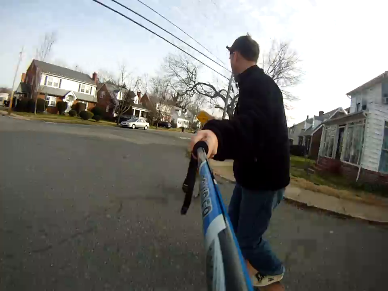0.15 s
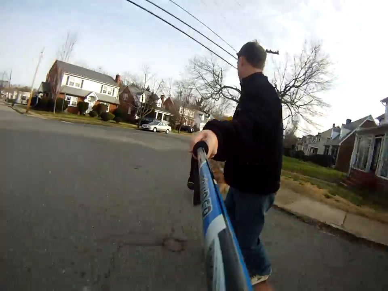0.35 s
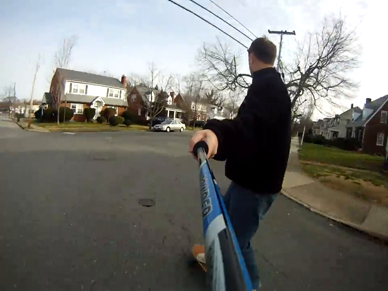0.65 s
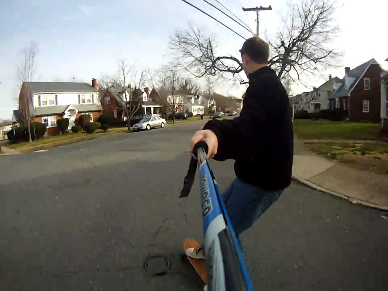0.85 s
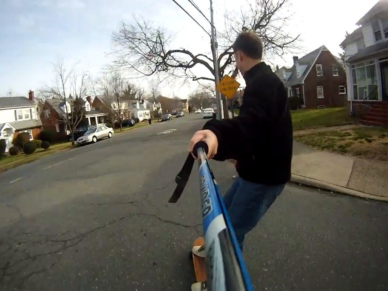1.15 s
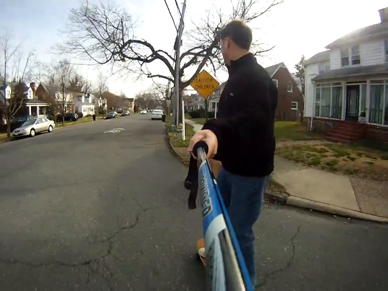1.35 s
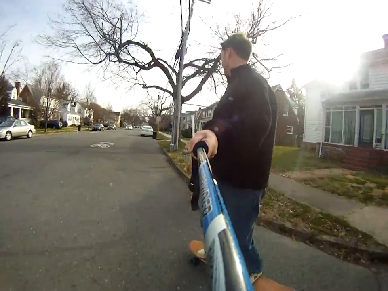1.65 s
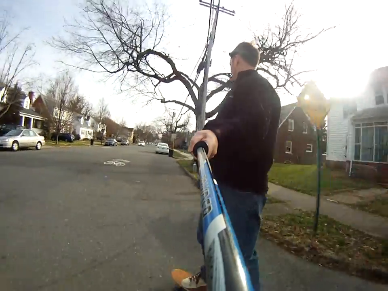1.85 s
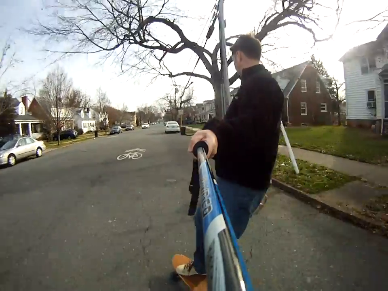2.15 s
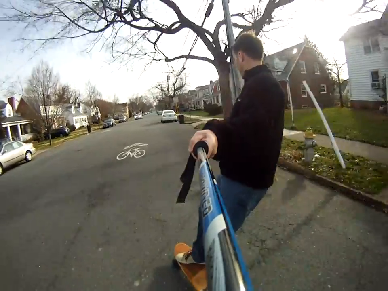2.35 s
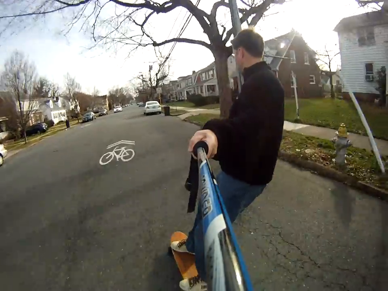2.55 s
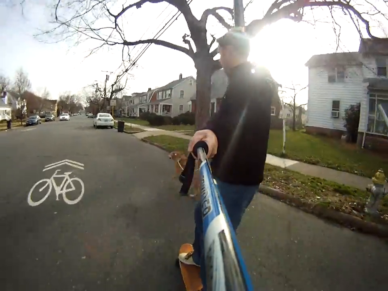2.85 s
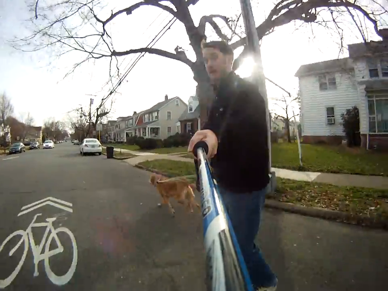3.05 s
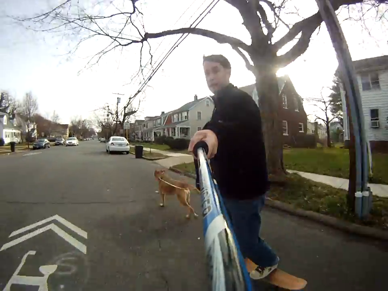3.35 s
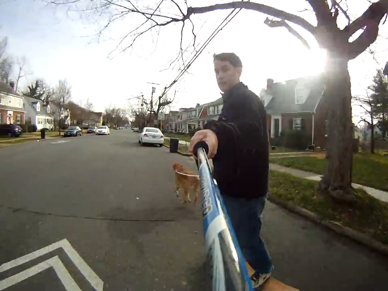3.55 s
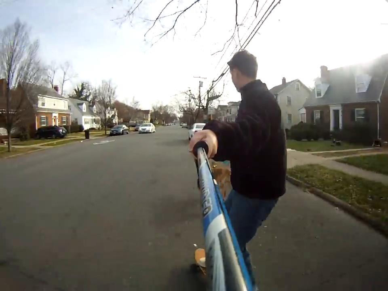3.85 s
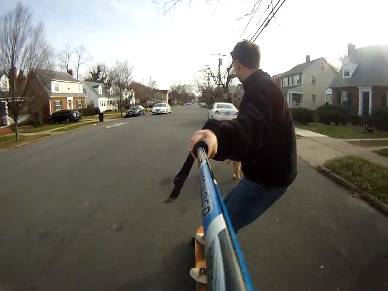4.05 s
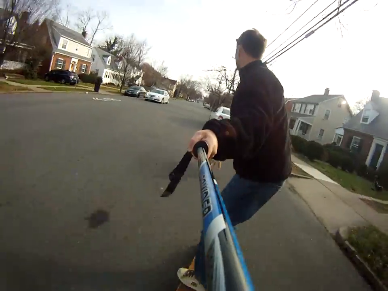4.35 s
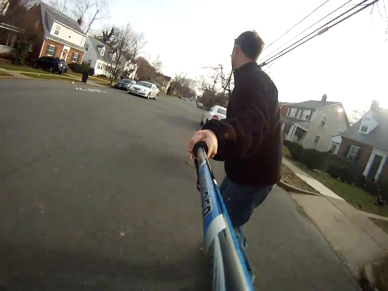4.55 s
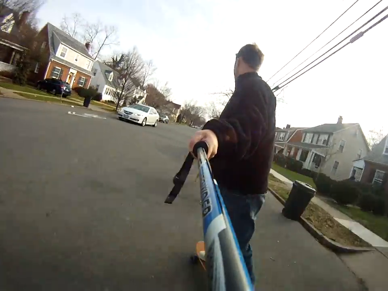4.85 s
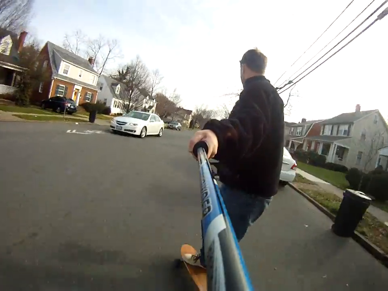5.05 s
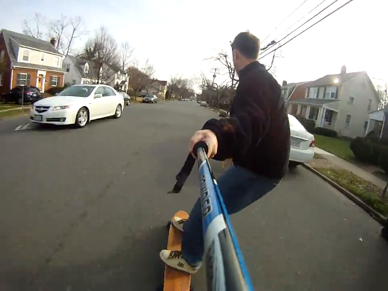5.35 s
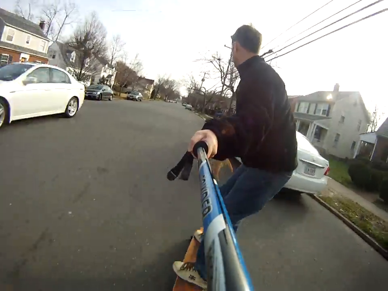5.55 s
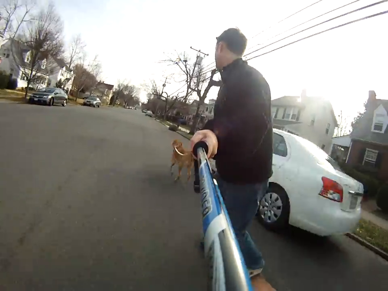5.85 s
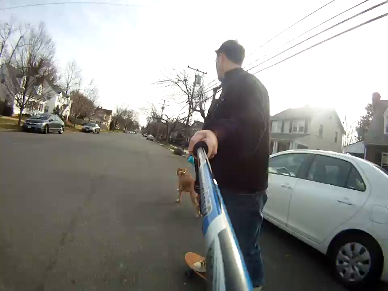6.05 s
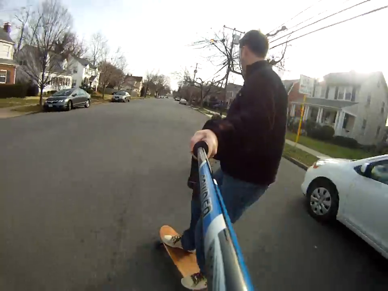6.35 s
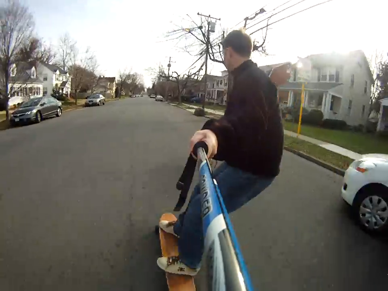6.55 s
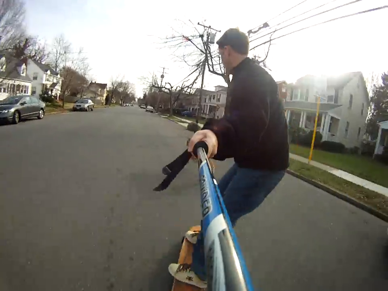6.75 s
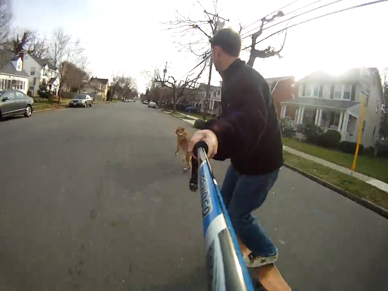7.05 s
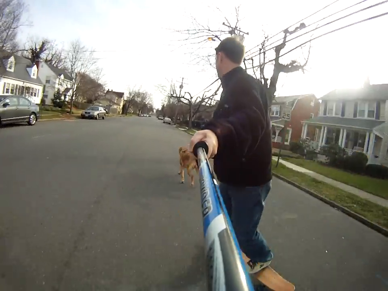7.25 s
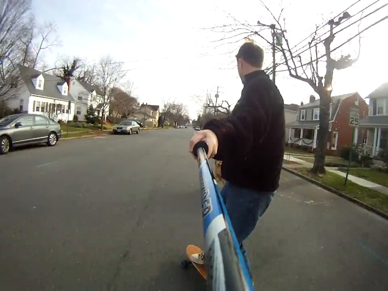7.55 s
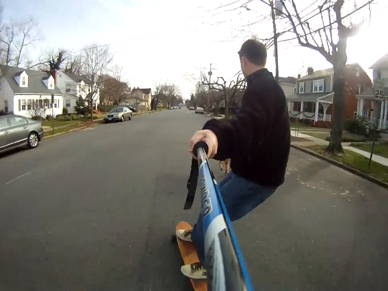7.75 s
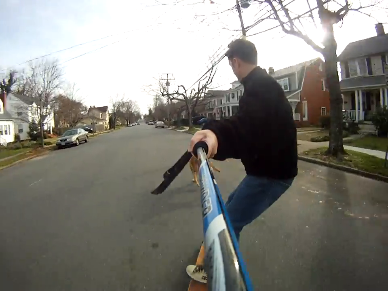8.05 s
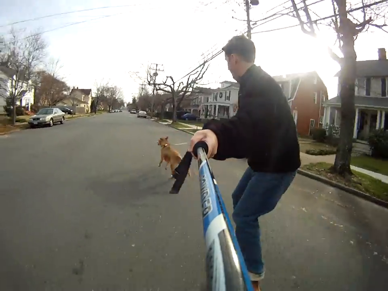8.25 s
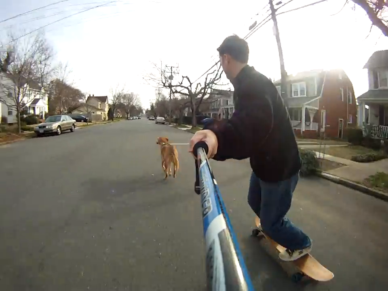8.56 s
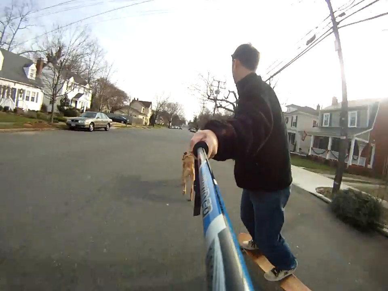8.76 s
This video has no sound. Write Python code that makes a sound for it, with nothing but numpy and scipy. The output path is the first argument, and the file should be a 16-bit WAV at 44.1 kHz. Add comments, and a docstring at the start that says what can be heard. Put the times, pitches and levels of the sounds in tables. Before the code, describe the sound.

A longboard weaves down a coarse street, its droning roll rising and falling with scrubby turns amid wind buffets and small gritty knocks.

```python
"""Longboard carving on rough asphalt

Heard from a small camera on a hand-held pole. Stones drum on wheels and deck as filtered random impulses.
In each carve the wheels hum, scrub and ring: roar is strongest on the toe side, ring on the heel side.
Grit and pebbles pop and a tag jingles, as impulses through resonances; wind is shaped noise plus pressure pulses.
A limiter ducks under strong buffets; a stepped converter adds a thin fizz."""
import sys
import numpy as np
from scipy import signal
from scipy.fft import rfft, irfft, next_fast_len
from scipy.io import wavfile
from scipy.ndimage import uniform_filter1d, map_coordinates

SR = 44100
rng = np.random.default_rng(int(sys.argv[2]) if len(sys.argv) > 2 else 0)


def wav_out(sig):
    """Save sig, one row per channel (or a flat mono array), as 16-bit PCM at SR to the path in sys.argv[1]."""
    wavfile.write(sys.argv[1], SR, np.round(np.clip(np.atleast_2d(sig).T, -1, 1) * 32767).astype(np.int16))


N = 392490
TIME = np.arange(N) / SR
FREQ_HZ = np.arange(N // 2 + 1) * SR / N

# breeze on the microphone: time_s, level_db
WIND = [(0.0, -24), (0.35, -28), (1.15, -19.5), (1.6, -29.5), (2.55, -22.9), (3.35, -28), (3.95, -17.5),
        (4.7, -22.5), (4.95, -23), (5.1, -20.5), (5.65, -16), (5.85, -27), (6.6, -24), (7.15, -20.0),
        (7.55, -29), (7.75, -22.0), (8.7, -27.1), (8.9, -22.9)]
# gusts on top of the breeze: centre_s, length_s, change_db
GUSTS = [(.64, 0.33, 5.5), (1.07, 0.14, 5), (2.46, .14, 3.5), (2.79, 0.055, 8.5), (3.69, 0.069, 7),
         (4.5, 0.36, 3.5), (5.09, 0.19, 2.5), (5.3, 0.15, 2), (5.48, 0.14, 0), (5.64, .14, -3.5),
         (5.97, 0.092, 7), (6.23, 0.11, 6), (7.13, 0.099, 2), (7.29, 0.11, 2), (8.1, 0.14, 6),
         (8.29, 0.13, 5.5)]
# single eddies hitting the microphone: time_s, peak_db, width_s, pressure_sign
BUFFETS = [(0.574, -11, .002, -1), (3.904, -9.5, .0025, -1), (4.038, -7.5, 0.0021, -1),
           (4.325, -2, 0.0041, -1), (4.365, -4, 0.0027, -1), (5.492, -2.5, 0.0014, -1),
           (5.576, -2.5, 0.0019, 1), (5.686, 3, 0.0019, -1), (6.722, -8, 0.0022, -1),
           (6.778, 1.5, 0.0028, -1), (7.148, -5, 0.0037, -1), (7.29, -11, 0.0023, 1),
           (7.773, -8, 0.0021, -1), (8.129, -10, 0.0018, -1), (8.275, -14, 0.0013, -1)]
# turbulence spectrum: freq_hz, relative_db_per_hz
AIR_SPECTRUM = [(10, -16), (22, -0.5), (45, -2.5), (85, -4.5), (130, -9.5), (200, -14.5), (400, -39),
                (1000, -58)]

# light metallic ticks, like a collar tag: time_s, peak_db
TICKS = [(.559, -36), (1.237, -34), (1.705, -35), (1.728, -33), (1.790, -34.5), (1.846, -29), (3.630, -37),
         (3.702, -34), (3.754, -29), (3.773, -31), (3.784, -32), (4.838, -31), (8.035, -34), (8.222, -35)]
# stretches of faint jingling: centre_s, length_s, rms_db at the centre
JINGLES = [(1.9, 0.89, -51.5), (3.148, 1.2, -53), (8.6, .7, -62)]
# tag resonances: freq_hz, width_hz, relative_db
TAG_MODES = [(2660, 450, 7.5), (4500, 400, 14), (5160, 500, -28)]

# pebbles and cracks under a wheel: time_s, peak_db
PEBBLES = [(.439, -13.5), (1.037, -10), (1.401, -6.5), (1.408, -19), (1.562, -14), (2.559, -20),
           (2.871, -6), (3.499, -13), (3.548, -14), (4.104, -20), (5.950, -30), (6.398, -23), (7.966, -17)]
# pebble and grit resonances: freq_hz, width_hz, relative_db
PEBBLE_MODES = [(600, 250, 13), (1010, 150, -2), (1680, 230, 2), (2280, 190, -5.5), (2700, 140, 3)]

# carves, heel and toe side in turn:
# start_s, apex_s, end_s, lean (+ toes, - heels), rumble_rise_db, hum_rise_db, scrub_rise_db
CARVES = [(-.25, 0.275, 0.76, -0.86, 0, 4.75, 3.2), (0.682, 1.055, 1.34, 1.3, 5.5, 6, 7.3),
          (1.28, 1.573, 1.85, -1.01, 1.5, 6.25, 5.5), (1.784, 2.6, 3, 0.8, 6, 9.36, 2.5),
          (2.92, 3.5, 3.7, -1.02, 1, 5.23, 2.97), (3.723, 4.146, 4.3, .8, 3.5, 7.2, 3.9),
          (4.356, 4.63, 4.97, -1.01, -0.5, 9.7, 5.6), (5.084, 5.369, 5.63, 1.05, 5.5, 6, 4.8),
          (5.66, 5.916, 6.29, -0.96, 0.5, 8.3, 5.75), (6.21, 6.614, 6.74, 1.03, 4.5, 12, 6.7),
          (6.844, 7.179, 7.4, -1.02, 0, 7.4, 6.47), (7.58, 7.934, 8.18, 1.14, 3.5, 9.4, 5.6),
          (8.14, 8.64, 9.04, -0.88, -1.7, 9.5, 3)]
# rider's weight eases between carves, all roll levels change: centre_s, length_s, change_db
EASES = [(.62, 0.053, -2), (3.72, 0.2, -1), (4.34, .16, 0), (5.58, 0.16, -0.5), (7.52, .16, -2),
         (8.2, 0.28, -2.5)]
# asphalt coarseness as drumming strength: time_s, level_db
ASPHALT = [(0.0, 1), (0.7, 1.4), (1.1, 4.6), (1.8, 1.46), (2.7, 2.5), (3.1, 0.8), (3.7, 1.25), (4.3, 0.4),
           (5.6, -0.14), (6.2, -1.5), (7.5, 0.45), (8.9, -1.55)]

# moments when the random drumming of the wheels happens to peak: time_s, peak_db before EASES
HUM_PEAKS = [(2.233, -13), (2.377, -4), (2.486, -7), (3.094, -7), (3.203, -7), (5.942, -12), (6.404, -5.5),
             (7.949, -16)]
# resonances of these hum peaks: freq_hz, width_hz, relative_db
HUM_PEAK_MODES = [(496, 86, -5), (574, 45, -12.5)]
# wheels drone briefly on their lower bounce: centre_s, length_s, rise_db
DRONES = [(.82, 0.12, 2.5), (1.99, 0.43, 7), (2.8, 0.14, 4), (4.2, 0.27, 5), (5.41, 0.079, 9),
          (6.0, 0.18, 12), (6.29, 0.28, 10.5), (8.04, 0.096, 6.5)]
# lower wheel bounce: freq_hz, width_hz, relative_db
LOW_HUM_MODES = [(449, 57, -9), (500, 88, -8.5)]
# upper wheel bounce before stiffening: freq_hz, width_hz, relative_db
HIGH_HUM_MODES = [(555, 46.6, 0)]
# deck rumble spectrum: freq_hz, relative_db_per_hz
DECK_SPECTRUM = [(40, -40), (130, -7.5), (210, -2.5), (295, 2.5), (380, -1.5), (480, -10.5), (640, -6.5),
                 (780, -19), (1000, -17.5), (1200, -32.5), (1700, -44), (3000, -50)]

# wheels juddering at the edge of grip: start_s, end_s, first_hz, last_hz, rms_db at mid-span before EASES
JUDDERS = [(0.695, 1.1, 2450, 2080, -47), (1.50, 2.111, 1680, 1300, -40), (2.40, 2.82, 1780, 1920, -38),
           (4.30, 4.748, 2470, 3076, -55), (5.542, 5.744, 2500, 2970, -40),
           (5.783, 6.132, 2360, 2070, -39.5), (6.335, 6.497, 2490, 2940, -35),
           (6.759, 6.985, 2556, 2790, -39.5), (7.546, 7.76, 2800, 2716, -42),
           (8.06, 8.317, 2770, 2610, -43)]
# short skids that swell the scrub: centre_s, length_s, rise_db
SKIDS = [(.02, 0.084, 5), (.17, 0.089, 3.5), (.9, 0.12, 2), (4.14, 0.1, 2), (5.85, .14, 2.5),
         (6.4, 0.062, 1), (8.0, .12, 3.5)]
# wheel ring resonances: freq_hz, width_hz, relative_db
RING_MODES = [(1566, 73, 1), (3010, 200, -16.5), (3660, 120, -13.5), (5820, 820, -19)]
# tread scrub spectrum: freq_hz, relative_db_per_hz
SCRUB_SPECTRUM = [(500, -32), (900, 1.5), (1200, 2.5), (1370, 4.5), (1750, -0.5), (2000, 3.5), (2500, -1),
                  (2750, 1.5), (3100, -1), (3450, -10.5), (4050, -15), (4650, -6.5), (5150, -14),
                  (5900, -30.5)]
# tread roar spectrum: freq_hz, relative_db_per_hz
ROAR_SPECTRUM = [(400, -11), (620, 0.5), (720, 1), (850, 0.5), (1000, -4), (1120, -8), (1300, -28.5)]

# base levels with the board flat
RUMBLE_DB, LOW_HUM_DB, HIGH_HUM_DB = -27.5, -28, -31
ROAR_DB, RING_DB, SCRUB_DB = -41.5, -53.5, -41
GRIT_RE_SCRUB_DB = -10
# rise at the apex per unit of lean
ROAR_TOE_DB, ROAR_HEEL_DB = 10.5, 7
RING_TOE_DB, RING_HEEL_DB = 9.5, 15
LOW_HUM_SHARE = 0.16  # of the hum's rise in a carve
HUM_DB_PER_ASPHALT_DB = 1.8
HUM_STIFFEN_HZ_PER_DB = 5.5  # load stiffens the rubber: pitch climbs with the carve's hum rise
HUM_LAG_S, SCRUB_LEAD_S = 0.04, 0.041  # scrub comes early in a turn; hum and ring build late

LIMIT_DB, RELEASE_DB_PER_S, ATTACK_S = -6.5, 73, 0.0019
HOLD_HZ, CUTOFF_HZ = 12000, 15400


def from_db(db):
    """Decibels to gain."""
    return 10 ** (np.asarray(db) / 20)


def rms_one(x):
    """Scale to rms 1."""
    return x / np.sqrt(np.mean(x ** 2) + 1e-20)


def in_time(rows):
    """Each column of a curve table at every sample."""
    time_s, *columns = np.transpose(rows)
    return [np.interp(TIME, time_s, column) for column in columns]


def drift(rate_hz):
    """Slow chance with rms 1: noise low-passed around rate_hz."""
    spectrum = rfft(rng.standard_normal(N))
    return rms_one(irfft(spectrum / (1 + (FREQ_HZ / rate_hz) ** 2), N))


def steady(x, span_s=0.17):
    """Hold the running rms at 1, leaving the fast grain."""
    size = max(int(span_s * SR / 2), 2)
    power = uniform_filter1d(uniform_filter1d(x * x, size), size)
    return x / np.sqrt(power + 1e-12)


def coloured(x, spectrum):
    """Give x a spectrum that falls away steeply past its last point."""
    hz, db = np.transpose(spectrum)
    f = np.maximum(FREQ_HZ, 1)
    gain = from_db(np.interp(np.log(f), np.log(hz), db))
    rolloff = np.minimum(hz[-1] / f, 1) ** 10
    return irfft(rfft(x) * gain * rolloff, N)


def band_pass(x, band_hz):
    """Third-order band-pass."""
    return signal.sosfilt(signal.butter(3, band_hz, "band", fs=SR, output="sos"), x)


def resonator(hz, width_hz):
    """Coefficients of a resonance with gain about 1 on top."""
    r = np.exp(-np.pi * width_hz / SR)
    return (1 - r * r) / 2 * np.array([1, 0, -1]), [1, -2 * r * np.cos(2 * np.pi * hz / SR), r * r]


def body(x, modes):
    """Drive a set of resonances in parallel."""
    driven = x + 1e-18  # avoids denormals
    return sum(from_db(db) * signal.lfilter(*resonator(hz, width_hz), driven) for hz, width_hz, db in modes)


def arch(start_s, apex_s, end_s):
    """A rounded rise from 0 to 1 at the apex and back; zero outside."""
    out, inside = np.zeros(N), (TIME > start_s) & (TIME < end_s)
    ramp = np.interp(TIME[inside], [start_s, apex_s, end_s], [0, 1, 0])
    out[inside] = np.sin(np.pi / 2 * ramp)
    return out


def centred_arch(centre_s, length_s):
    """Symmetric arch."""
    return arch(centre_s - length_s / 2, centre_s, centre_s + length_s / 2)


def swells(rows):
    """Summed change in dB of (centre_s, length_s, change_db) events."""
    return sum(db * centred_arch(centre_s, length_s) for centre_s, length_s, db in rows)


def carving(rises_db, lag_s):
    """Side load builds and lets go through each carve, lifting a level by that carve's rise."""
    out_db = np.zeros(N)
    for (start_s, apex_s, end_s, *_), rise_db in zip(CARVES, rises_db):
        out_db += rise_db * arch(start_s + lag_s, apex_s + lag_s, end_s + lag_s)
    return out_db


def glided(x, shift_hz):
    """Slide a narrow sound up in frequency by a moving amount."""
    analytic = signal.hilbert(x, next_fast_len(N))[:N]
    return np.real(analytic * np.exp(2j * np.pi * np.cumsum(shift_hz) / SR))


def knocks(rows, modes, decay_s, top_hz, snap):
    """A snap and a short crunch die away in a set of resonances; a low-pass dulls them."""
    out, age_s = np.zeros(N), TIME[:SR // 20]
    soft = signal.butter(5, top_hz, fs=SR, output="sos")
    for (time_s, peak_db), crunch in zip(rows, rng.standard_normal((len(rows), len(age_s)))):
        force = snap * (age_s == 0) + crunch * np.exp(-age_s / decay_s)
        hit = signal.sosfilt(soft, body(force, modes))
        at = int(time_s * SR)
        out[at:at + len(age_s)] += from_db(peak_db) * hit / np.abs(hit).max()
    return out


def road(per_s, spread_db, flutter_db, flutter_hz):
    """Force on the wheels: stones of uneven size, met at random, in coarser and finer patches."""
    sizes = from_db(spread_db * np.minimum(rng.exponential(1, N), 4)) * rng.choice([-1, 1], N)
    met = rng.random(N) < per_s / SR
    return sizes * met * from_db(flutter_db * drift(flutter_hz))


def wind():
    """Lumpy low turbulence at the microphone."""
    turbulence = coloured(rng.standard_normal(N), AIR_SPECTRUM)
    return steady(turbulence * from_db(3.4 * drift(22)), span_s=0.22)


def buffets(rebound=0.35, fray_db=-33):
    """An eddy is a pressure pulse with weaker opposite swings beside it; a strong core frays into a hiss."""
    out, fray = np.zeros(N), from_db(fray_db) * rng.standard_normal(N)
    for time_s, peak_db, width_s, sign in BUFFETS:
        u = np.minimum(((TIME - time_s) / width_s) ** 2, 100)
        core = from_db(peak_db) * np.exp(-u / 2)
        out += np.sign(sign) * core * (1 - rebound * u) + fray * core ** 2
    return out


def air():
    """Breeze and gusts set the turbulence level; buffets add to it."""
    wind_db, = in_time(WIND)
    return from_db(wind_db + swells(GUSTS)) * wind() + buffets()


def jingle():
    """Many tiny touches keep the tag ringing for a while."""
    level = sum(from_db(db) * centred_arch(centre_s, length_s) ** 2 for centre_s, length_s, db in JINGLES)
    touches = rng.standard_normal(N) * (rng.random(N) < 600 / SR)
    return level * rms_one(band_pass(body(touches, TAG_MODES), [3400, 5300]))


def tag():
    """Single ticks and stretches of jingling share the tag's resonances."""
    return knocks(TICKS, TAG_MODES, decay_s=0.0045, top_hz=5550, snap=6.7) + jingle()


def pebbles():
    """Pebbles and cracks pop under a wheel."""
    return knocks(PEBBLES, PEBBLE_MODES, decay_s=0.0052, top_hz=3120, snap=8.7)


def grit():
    """Loose grains crack under the wheels in little clusters."""
    cracks = body(road(per_s=90, spread_db=2, flutter_db=3, flutter_hz=20), PEBBLE_MODES)
    return rms_one(band_pass(cracks, [1400, 3300]))


def wheel_scrub():
    """Tread tears loose from the stones in tiny slips."""
    return steady(coloured(road(per_s=5000, spread_db=1.0, flutter_db=1.38, flutter_hz=70), SCRUB_SPECTRUM))


def tread_roar():
    """Air is squeezed from the gaps between stones as the tread covers them."""
    return steady(coloured(road(per_s=3800, spread_db=3.5, flutter_db=2.0, flutter_hz=45), ROAR_SPECTRUM))


def wheel_ring(waver=0.00801):
    """Stones set the wheels ringing at a slightly wavering pitch; the tread damps the highest notes."""
    ringing = body(road(per_s=2500, spread_db=2.6, flutter_db=1.4, flutter_hz=25), RING_MODES)
    warped = np.arange(N) + np.cumsum(waver * drift(5.01))
    ringing = map_coordinates(ringing, [warped], order=3, mode="mirror")
    return steady(signal.sosfilt(signal.butter(1, 5000, fs=SR, output="sos"), ringing))


def judders(slip_hz, width_hz, depth):
    """The tread sticks and slips quickly; slips pulse a resonance that glides with the load."""
    out = np.zeros(N)
    slip_rate_hz = slip_hz * (1 + 0.11 * drift(14.94))
    slips = 1 + depth * np.cos(2 * np.pi * np.cumsum(slip_rate_hz) / SR)
    ringing = (drift(width_hz / 2) + 1j * drift(width_hz / 2)) * slips
    for start_s, end_s, first_hz, last_hz, rms_db in JUDDERS:
        span = slice(int(start_s * SR), int(end_s * SR))
        u = np.linspace(0, 1, len(TIME[span]))
        phase = 2 * np.pi * np.cumsum(first_hz + (last_hz - first_hz) * u) / SR
        tone = rms_one(np.real(ringing[span] * np.exp(1j * phase)))
        out[span] += from_db(rms_db) * np.sin(np.pi * u) * tone
    return out


def tread():
    """The tread scrubs in every carve; it roars most on the toe side and rings most on the heel side."""
    *_, lean, _, _, scrub_rise_db = np.transpose(CARVES)
    toe, heel = np.maximum(lean, 0), np.maximum(-lean, 0)
    roar_db = ROAR_DB + carving(ROAR_TOE_DB * toe + ROAR_HEEL_DB * heel, 0)
    ring_db = RING_DB + carving(RING_TOE_DB * toe + RING_HEEL_DB * heel, HUM_LAG_S)
    scrub_db = SCRUB_DB + carving(scrub_rise_db, -SCRUB_LEAD_S) + swells(SKIDS)
    roar = from_db(roar_db) * tread_roar()
    ring = from_db(ring_db) * wheel_ring()
    scrub = from_db(scrub_db) * (wheel_scrub() + from_db(GRIT_RE_SCRUB_DB) * grit())
    return roar + ring + scrub + judders(slip_hz=149.4, width_hz=390, depth=0.37)


def deck_rumble():
    """The deck passes the low part of the road's drumming."""
    return steady(coloured(road(per_s=3000, spread_db=0.5, flutter_db=1.5, flutter_hz=35), DECK_SPECTRUM))


def wheel_hum(modes, band_hz):
    """Stones set the wheels bouncing on their own rubber."""
    bouncing = body(road(per_s=2000, spread_db=2.5, flutter_db=0.5, flutter_hz=30), modes)
    return steady(band_pass(bouncing, band_hz))


def board():
    """Deck and wheels drum harder on coarse asphalt and change with carve load; chance hum peaks are added."""
    coarse_db, = in_time(ASPHALT)
    *_, rumble_rise_db, hum_rise_db, _ = np.transpose(CARVES)
    hum_db = carving(hum_rise_db, HUM_LAG_S)
    rumble = from_db(RUMBLE_DB + coarse_db + carving(rumble_rise_db, 0)) * deck_rumble()
    low_db = LOW_HUM_DB + LOW_HUM_SHARE * hum_db + swells(DRONES)
    low = from_db(low_db) * wheel_hum(LOW_HUM_MODES, band_hz=[330, 620])
    stiffened = glided(wheel_hum(HIGH_HUM_MODES, band_hz=[440, 760]), HUM_STIFFEN_HZ_PER_DB * hum_db)
    high = from_db(HIGH_HUM_DB + hum_db) * stiffened
    hum = from_db(HUM_DB_PER_ASPHALT_DB * coarse_db) * (low + high)
    hum_peaks = knocks(HUM_PEAKS, HUM_PEAK_MODES, decay_s=0.0052, top_hz=760, snap=16.6)
    return rumble + hum + hum_peaks


def scene():
    """Wind, tag, pebbles and rolling board at the end of the pole."""
    roll = from_db(swells(EASES)) * (tread() + board())
    return (air() + tag() + pebbles() + roll)[None]


def limiter(x):
    """Gain falls on a peak, smoothed by the attack time, and climbs back at a steady dB rate."""
    over_db = np.maximum(20 * np.log10(np.abs(x) + 1e-9) - LIMIT_DB, 0)
    release_db = RELEASE_DB_PER_S * TIME
    held_db = np.maximum.accumulate(over_db + release_db) - release_db
    r = np.exp(-1 / (ATTACK_S * SR))
    return x * from_db(-signal.lfilter([1 - r], [1, -r], held_db))


def record(dry):
    """Limiter, then a slow converter whose held steps mirror the sound around its rate; the top is cut."""
    low_pass = 1 / np.sqrt(1 + (FREQ_HZ / 5500) ** 40)
    narrow = irfft(rfft(limiter(dry[0])) * low_pass, N)
    mirrored = narrow * (1 + 2 * np.cos(2 * np.pi * HOLD_HZ * TIME))
    hold = np.sinc(FREQ_HZ / HOLD_HZ) * (FREQ_HZ < CUTOFF_HZ)
    return np.clip(irfft(rfft(mirrored) * hold, N), -1, 1)[None]


dry = scene()
out = record(dry)
wav_out(out)
```